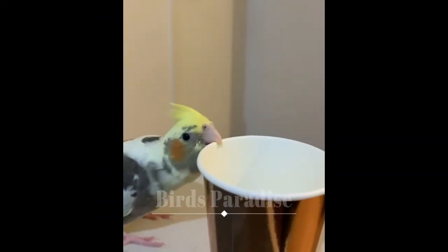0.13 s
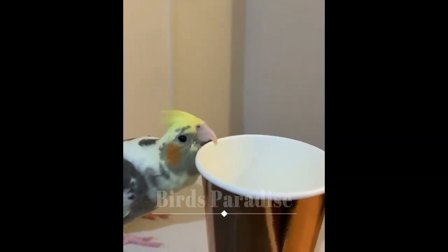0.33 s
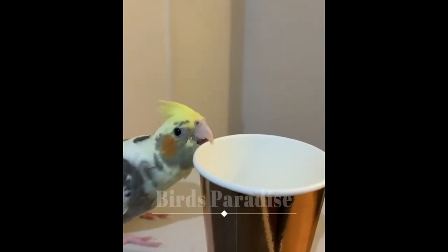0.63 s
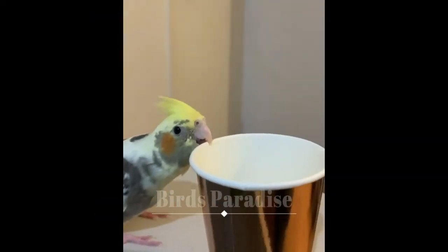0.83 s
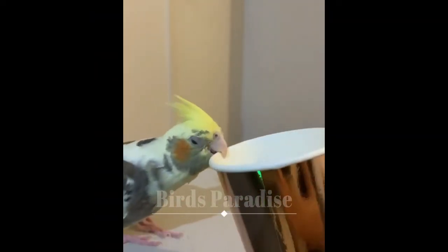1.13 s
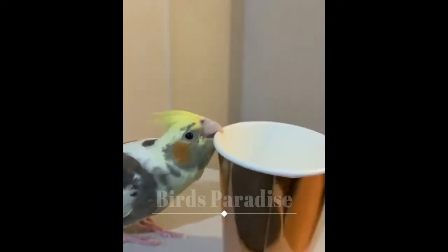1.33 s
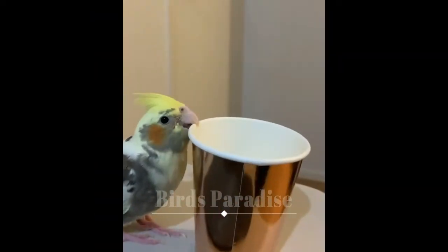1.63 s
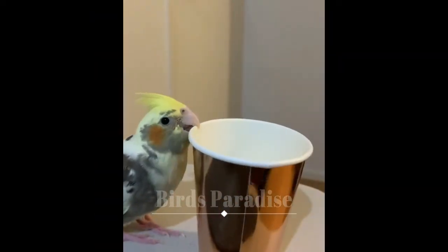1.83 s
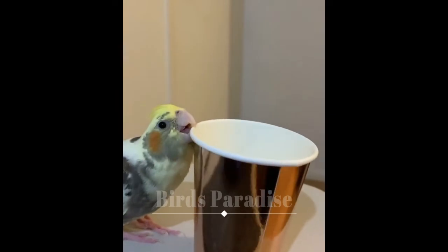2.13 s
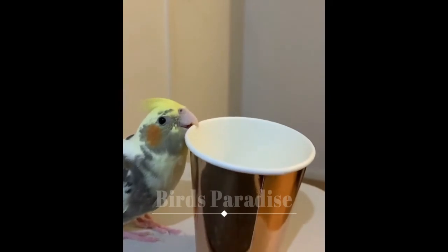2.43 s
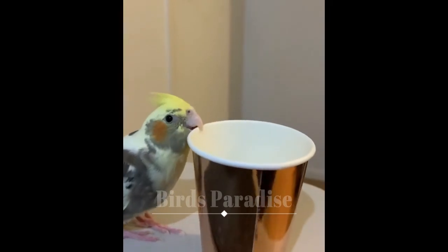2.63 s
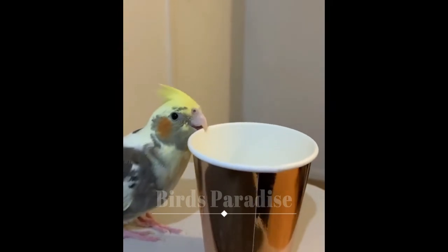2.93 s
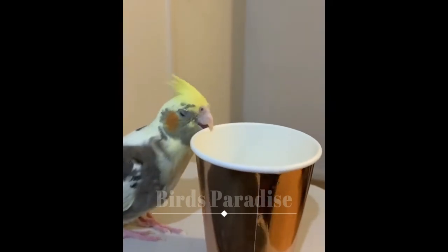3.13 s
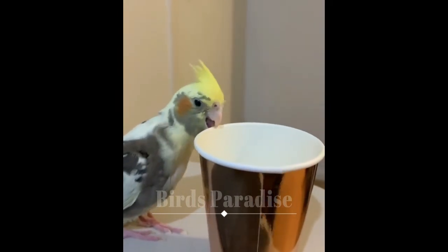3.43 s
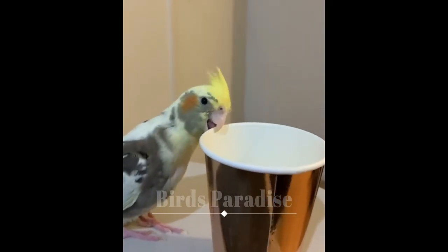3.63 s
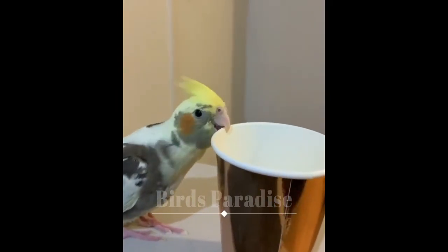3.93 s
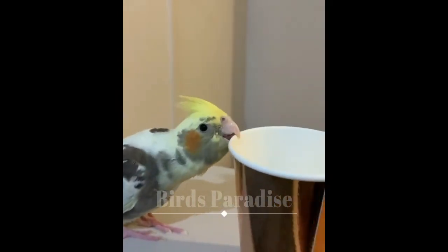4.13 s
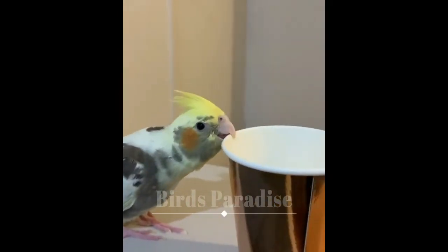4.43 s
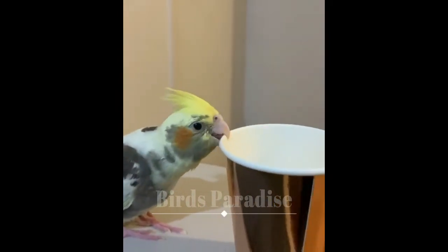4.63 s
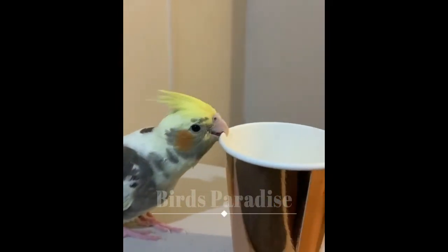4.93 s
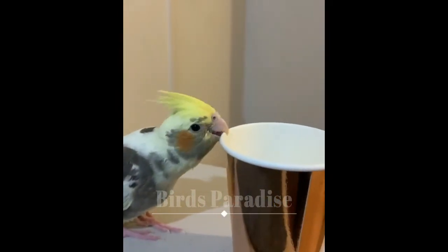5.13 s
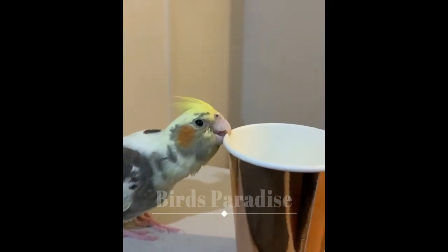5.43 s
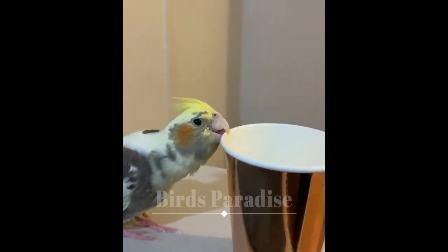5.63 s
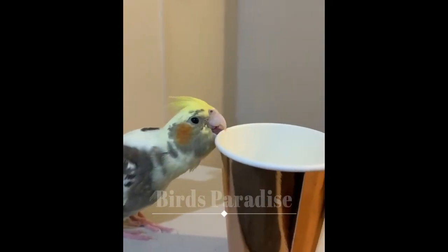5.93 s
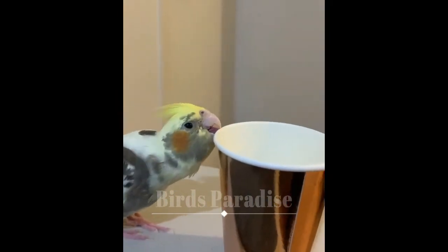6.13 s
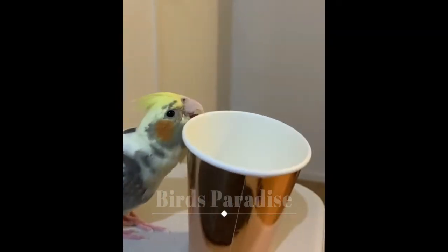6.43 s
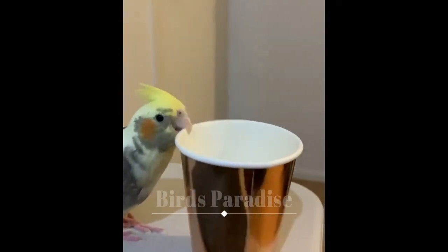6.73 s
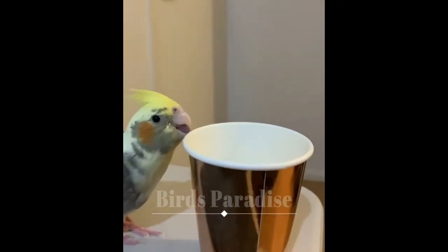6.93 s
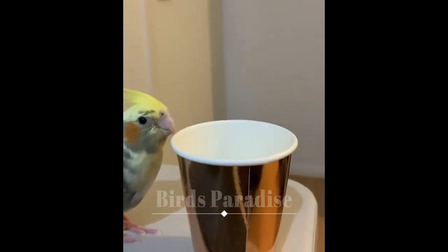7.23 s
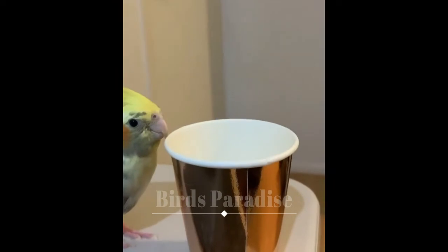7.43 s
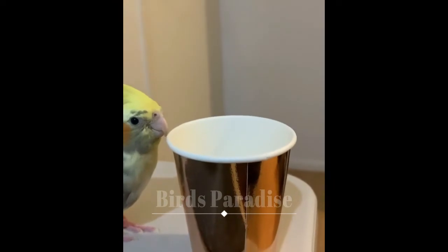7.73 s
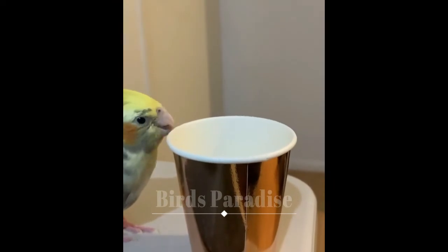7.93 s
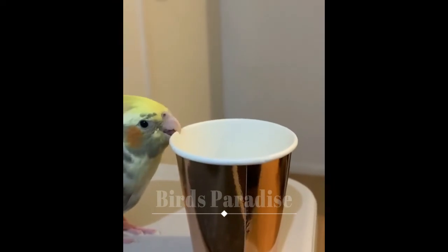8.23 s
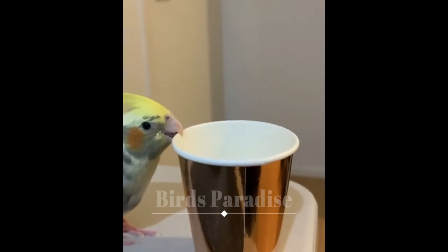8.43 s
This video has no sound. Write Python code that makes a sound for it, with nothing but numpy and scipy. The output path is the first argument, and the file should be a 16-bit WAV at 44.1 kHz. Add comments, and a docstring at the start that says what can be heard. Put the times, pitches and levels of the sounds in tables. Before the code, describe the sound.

Close to a small microphone in a quiet room, a bird nibbles an empty paper cup. Quick clusters of hollow, woody taps and papery scratches come first, with a sharp slap as the cup rocks. Nibbling then turns faint and sparse, flares twice more with brief juddering tugs, and ends with a few hard knocks and scuffs nearby over soft room air and a low rumble that stops midway.

```python
"""Cockatiel nibbling a paper cup

A cockatiel nibbles the rim of an empty paper cup on a table, close to a phone in a small room.
Beak taps excite damped modes of the cup's air, wall and table; tugs make the base stick and slip in a judder.
Filtered grains give the scrape and crackle of paper, a narrow resonance the creaks, short noise bursts the slaps.
Soft bumps, then a few hard knocks and scuffs from nearby join in, over room air, hum and a low rumble."""
import sys
import numpy as np
from scipy import signal
from scipy.fft import rfft, irfft
from scipy.io import wavfile
from scipy.ndimage import uniform_filter1d

SR = 44100
rng = np.random.default_rng(int(sys.argv[2]) if len(sys.argv) > 2 else 0)


def store_wav(level_fs):
    """Save 16-bit WAV to argv[1]."""
    pcm = np.round(np.clip(np.atleast_2d(level_fs), -1, 1) * 32767)
    wavfile.write(sys.argv[1], SR, pcm.T.astype(np.int16))


N = 378378
TIME = np.arange(N) / SR  # s
FREQS = np.fft.rfftfreq(N, 1 / SR)  # Hz

# Taps of beak and base on the cup. Each row: start in seconds, relative levels in dB of the hollow modes,
# the wall modes and the contact tick, pitch of the hollow in Hz, pitch of the wall in Hz.
TAP_EVENTS = [(0.091, -41, -47.5, -54, 610, 1090), (0.169, -34.5, -39.5, -44, 680, 1036),
              (0.24, -21.5, -34, -47, 622, 1035), (0.266, -22, -26, -46, 586, 1062),
              (0.486, -30, -44, -45, 644, 1130), (0.499, -30, -30.5, -41.5, 614, 1015),
              (0.768, -27, -36, -40, 660, 1117), (0.854, -24.5, -37.5, -51, 678, 1130),
              (0.871, -28.5, -45, -56, 715, 1110), (0.886, -31, -46, -50, 593, 1116),
              (0.948, -22.5, -36, -54, 689, 1110), (0.985, -22, -44, -50.5, 678, 1060),
              (1.105, -31.5, -41.5, -50, 667, 1080), (1.238, -24.5, -47, -51, 672, 1091),
              (1.274, -51.5, -50, -54, 669, 1089), (1.284, -14.5, -26, -40, 635, 1092),
              (1.294, -15.5, -26, -46, 620, 1030), (1.321, -20, -45, -48, 663, 1050),
              (1.339, -24.5, -49, -36, 683, 1053), (1.396, -28, -36, -34, 727, 1030),
              (1.431, -29, -48, -48, 686, 1070), (1.449, -34, -53, -56, 663, 1080),
              (1.605, -53, -43.5, -56, 660, 1093), (1.747, -47.5, -39.5, -51, 660, 1094),
              (1.826, -42.5, -42.5, -54, 677, 1060), (2.049, -34, -44, -51, 666, 1126),
              (2.134, -52.5, -40.5, -44.5, 615, 1114), (2.249, -54, -57, -46, 666, 1100),
              (2.265, -45.5, -44, -58, 674, 1110), (2.33, -50, -42, -51, 640, 1104),
              (2.59, -39, -59, -53, 667, 1010), (2.616, -30, -44.5, -70, 631, 1002),
              (2.651, -32, -45, -70, 655, 1040), (2.673, -45, -47.5, -60, 661, 1130),
              (2.706, -37, -50, -66, 620, 997), (2.804, -48.5, -42.5, -46, 697, 1096),
              (2.914, -51, -49.5, -49, 684, 1132), (3.004, -45.5, -46.5, -58, 590, 1154),
              (3.083, -46, -50, -53, 643, 1057), (3.296, -47.5, -56, -64, 728, 1043),
              (3.506, -29.5, -36.5, -54, 668, 1050), (3.821, -38.5, -39, -49, 654, 1080),
              (3.926, -29, -40.5, -40, 673, 990), (3.937, -28.5, -46, -35, 635, 1020),
              (3.957, -19.5, -32, -25, 623, 1140), (4.093, -21.5, -33.5, -51, 667, 1065),
              (4.101, -25, -30.5, -52.5, 642, 1060), (4.518, -36, -49, -43, 657, 1143),
              (4.55, -35.5, -50, -55, 646, 1131), (4.578, -45.5, -56, -58, 640, 1080),
              (4.696, -40.5, -47.5, -47.5, 618, 1107), (4.752, -45.5, -56, -58, 655, 1070),
              (4.774, -42.5, -51, -55, 660, 1118), (4.952, -44, -49.5, -70, 644, 1015),
              (4.987, -34, -39, -55, 670, 1040), (5.08, -40, -44.5, -54, 690, 1070),
              (5.242, -46.5, -60, -52, 660, 1090), (5.254, -31.5, -36.5, -50, 616, 1072),
              (5.372, -44.5, -55.5, -54, 622, 1080), (5.461, -55, -51, -65, 688, 1080),
              (5.511, -54, -58, -53, 663, 930), (5.786, -60, -48.5, -53, 654, 1120),
              (5.887, -60, -49.5, -56.5, 660, 1097), (6.158, -22.5, -42, -36.5, 643, 1057),
              (6.203, -21, -35, -33, 643, 1056), (6.221, -19.5, -54, -47, 674, 990),
              (6.261, -31.5, -58, -56, 666, 1020), (6.613, -41, -50, -48, 684, 1113),
              (6.682, -27, -52, -53, 666, 1100), (6.694, -27, -47, -58, 655, 1055),
              (6.716, -30, -45, -54, 700, 1010), (6.724, -22.5, -21, -27, 624, 1077),
              (6.764, -34, -40, -59, 643, 1010), (6.933, -36.5, -41.5, -71, 652, 1090),
              (6.952, -30.5, -40, -60.5, 694, 1063), (7.982, -54.5, -39.5, -54.5, 573, 1100),
              (8.012, -47.5, -49, -63, 666, 1070), (8.156, -42, -45, -48, 660, 1014),
              (8.171, -46, -42.5, -38, 606, 1135), (8.379, -42.5, -56, -46, 587, 1006),
              (8.402, -46, -66, -68, 567, 1000), (8.421, -54, -48, -62, 632, 1100),
              (8.555, -65, -55.5, -49, 660, 1220)]
# Tugs that drag the base over the table. Each row: start in seconds, length in seconds,
# relative judder level in dB, relative paper crackle level in dB, pitch of the hollow in Hz.
TUG_EVENTS = [(0.836, 0.061, -31, -51.5, 655.7), (0.936, 0.036, -31.5, -61, 654),
              (0.986, 0.022, -36.5, -56, 651), (1.3, 0.057, -32.5, -53, 631), (1.347, 0.062, -31, -54, 676),
              (1.413, 0.047, -37.5, -56, 667), (3.949, 0.035, -32, -43, 634),
              (6.166, 0.03, -34.5, -53, 630), (6.198, 0.043, -29.5, -49, 649),
              (6.248, 0.017, -35.5, -53, 640), (6.68, 0.032, -30, -51.5, 649)]
# Modes of the air inside the cup. Each row: multiple of its pitch, t60 in seconds, relative level in dB.
HOLLOW_MODES = [(.73, 0.024, -6), (.88, 0.029, -3), (1, 0.033, 4)]
# Modes of the paper wall. Each row: multiple of its pitch, t60 in seconds, relative level in dB.
WALL_MODES = [(.94, 0.024, -7.5), (1, 0.037, 4), (1.36, 0.024, -15.5), (1.63, 0.012, -7),
              (2.2, 0.0047, -18)]
# Spectrum of cracking fibres. Each row: frequency in Hz, relative level in dB per Hz.
FIBRE_SPECTRUM = [(500, -30.5), (2000, -2), (2750, -6), (3300, -5.5), (3900, -6), (4750, -15), (5500, 7.5),
                  (6100, -6.5), (7100, 2.5), (8000, 0.5), (9200, -21), (10500, -10.5), (12300, -34),
                  (14000, -47)]
HOLLOW_HZ, WALL_HZ = 656, 1036  # pitches of the cup at rest
TUG_ATTACK_S, TUG_RELEASE_S, TUG_SAG_DB_PER_S = 0.0083, 0.0033, 30
SCRAPE_ATTACK_S, SCRAPE_RELEASE_S, SCRAPE_SAG_DB_PER_S = 0.065, 0.014, 22


def undb(db):
    """Invert the decibel law: amplitude gain is ten to the power of dB / 20."""
    return 10 ** (np.asarray(db) / 20)


def unit(x):
    """Normalize by mean power, to rms 1."""
    return x / np.sqrt(np.mean(x ** 2))


def across(points, freqs):
    """Interpolate (Hz, value) points along a logarithmic frequency axis."""
    hz, value = np.transpose(points)
    return np.interp(np.log(freqs + 1), np.log(hz), value)


def colour(x, points):
    """Minimum-phase filtering: folding the cepstrum makes a causal filter of the given (Hz, dB) spectrum."""
    cepstrum = irfft(np.log(undb(across(points, FREQS))), N)
    cepstrum[1:N // 2] *= 2
    cepstrum[N // 2 + 1:] = 0
    return irfft(rfft(x) * np.exp(rfft(cepstrum)), N)


def walk(rate):
    """Slow random modulation: straight lines join normal random values drawn rate times a second."""
    knots = rng.standard_normal(4096)
    return np.interp(TIME * rate, np.arange(len(knots)), knots)


def add(track, s, sound):
    """Linear superposition: mix a sound in at time s."""
    start = max(int(s * SR), 0)
    part = sound[:max(N - start, 0)]
    track[start:start + len(part)] += part


def ring(modes, pitch=1, scatter_db=0, sag_per_s=0, size=8000):
    """Modal decay after one blow: damped sines whose shares vary with the point of contact; pitch may sag."""
    t = TIME[:size]
    turns = pitch * np.cumsum(np.exp(-sag_per_s * t)) / SR
    total = np.zeros(len(t))
    for hz, t60, db in modes:
        gain = undb(db + scatter_db * rng.standard_normal())
        total += gain * np.sin(2 * np.pi * hz * turns) * np.exp(-np.log(1000) * t / t60)
    return total


def grains(rate, spread_db):
    """Shot noise of friction: random tiny slips of uneven size and either sign, at rms 1."""
    sizes = undb(spread_db * np.minimum(rng.exponential(size=N), 3.5)) * rng.choice([-1, 1], N)
    return unit((rng.random(N) < rate / SR) * sizes)


def scratch(rise_s, decay_s, size=2400):
    """Contact noise: grainy noise swells and dies exponentially as two surfaces touch."""
    t = TIME[:size]
    # each run of 20 samples has its own random level
    grain = rng.standard_normal(size) * undb(2.57 * rng.standard_normal(size // 20).repeat(20))
    return grain * (1 - np.exp(-t / rise_s)) * np.exp(-t / decay_s)


def stroke(length, attack_s, release_s, sag_db_per_s):
    """Pressure envelope of friction: it builds, eases slowly while held, and is let go."""
    t = TIME[:SR // 2]
    held = np.minimum(t / attack_s, 1) * undb(-sag_db_per_s * t)
    return held * np.exp(-np.maximum(t - length, 0) / release_s)


def hum():
    """Periodic excitation by mains and fan: low tones whose level and phase waver a little."""
    # Each row: frequency in Hz, relative level in dB.
    hum_tones = [(76, -64.5), (100, -66.5), (138, -65.5)]
    total = np.zeros(N)
    for hz, db in hum_tones:
        level = undb(db + 2.5 * walk(rate=4))
        total += level * np.sqrt(2) * np.sin(2 * np.pi * hz * TIME + walk(rate=7))
    return total


def background(air_db=-58, width=1.0, bass_width=0.37, left_db=0.72):
    """Diffuse-field coherence: room air more alike at both ports in the bass, plus rumble and hum."""
    # Spectrum of the room air. Each row: frequency in Hz, relative level in dB.
    air_spectrum = [(24, -39), (40, 3.5), (112, -1), (140, -1), (197, -3.5), (337, -9.5), (453, -10),
                    (654, -17), (968, -22), (1070, -20), (2520, -42.5), (3300, -45.5), (9230, -47),
                    (11800, -43), (14000, -97)]
    rumble_db, rumble_ends_s, rumble_fade_s = -63, 5.12, 0.23
    mid, side = unit(colour(rng.standard_normal((2, N)), air_spectrum))
    side = irfft(rfft(side) * across([(150, bass_width), (400, width)], FREQS), N)
    air = undb(air_db + walk(rate=2.97)) * (mid + np.array([side, -side]))
    low_spectrum = [(22, -48.5), (27, -22.0), (35, -8.5), (60, -22.0), (130, -30.0), (500, -76)]
    low = unit(colour(rng.standard_normal(N), low_spectrum))
    # the rumble dies away part of the way through
    rumble = undb(rumble_db) * low * np.clip((rumble_ends_s - TIME) / rumble_fade_s, 0, 1)
    return (air + hum() + rumble) * undb([[left_db], [-left_db]])  # a little stronger on the left


def sliding(tug_rub_db=-3, lead_s=0.057, slide_s=0.045, slide_crackle_db=-64, slide_rub_db=-60, follow=0.45):
    """Friction follows pressure: strength of crackle and rub in scrapes, tugs and slides around each tap."""
    # Scrapes and rubs, mostly of the beak on paper, a late one from nearby. Each row: start in seconds,
    # length in seconds, relative crackle level in dB, relative rub level in dB.
    scrape_events = [(0.283, 0.28, -62.5, -48), (0.52, 0.25, -67, -49.5), (0.815, 0.018, -45, -45),
                     (0.905, 0.037, -44.5, -46.5), (1.103, 0.19, -65, -53.5), (1.527, 0.32, -70, -56.5),
                     (1.876, 0.098, -90, -60), (1.997, 0.23, -92, -55.5), (2.295, 0.082, -89, -54.5),
                     (2.531, 0.044, -49, -56), (2.668, 0.086, -62, -55.5), (2.872, 0.19, -81, -55),
                     (3.075, 0.33, -86, -68.5), (3.533, 0.24, -61.5, -62), (3.966, 0.14, -57.5, -61),
                     (4.487, 0.061, -58, -63), (4.718, 0.067, -63, -58.5), (5.163, 0.15, -77.5, -70),
                     (5.724, 0.042, -75, -56.5), (6.545, 0.029, -52.5, -69), (6.741, 0.11, -64, -59.5),
                     (7.04, 0.037, -51, -57), (7.089, 0.13, -96, -56), (7.705, 0.037, -72, -55),
                     (8.077, 0.24, -61, -66), (8.283, 0.14, -68.5, -62.5), (8.544, 0.039, -52, -50)]
    crackle, rub = np.zeros((2, N))
    for s, length, crackle_db, rub_db in scrape_events:
        swell = stroke(length, SCRAPE_ATTACK_S, SCRAPE_RELEASE_S, SCRAPE_SAG_DB_PER_S)
        add(crackle, s, undb(crackle_db) * swell)
        add(rub, s, undb(rub_db) * swell)
    for s, length, _, db, _ in TUG_EVENTS:
        swell = undb(db) * stroke(length, TUG_ATTACK_S, TUG_RELEASE_S, TUG_SAG_DB_PER_S)
        add(crackle, s, swell)
        add(rub, s, undb(tug_rub_db) * swell)
    # the beak slides briefly into and out of each tap, harder for a louder one
    for s, *levels, _, _ in TAP_EVENTS:
        pressure = undb(follow * (max(levels) + 15.5))
        swell = pressure * stroke(slide_s, lead_s, SCRAPE_RELEASE_S, SCRAPE_SAG_DB_PER_S)
        add(crackle, s - lead_s, undb(slide_crackle_db) * swell)
        add(rub, s - lead_s, undb(slide_rub_db) * swell)
    return crackle, rub


def shifting(x, depth_db, rate):
    """Random colour: half-octave bands of the scrape and crackle swell and fade independently."""
    octaves = np.log2(np.clip(FREQS, 700, 11200) / 700)
    spectrum = rfft(x)
    total = np.zeros(N)
    for k in range(9):
        band = irfft(spectrum * np.maximum(1 - abs(2 * octaves - k), 0), N)
        total += band * undb(depth_db * walk(rate))
    return total


def paper(crackle_db=0, rub_db=1, snap_db=5, murmur_db=-2, flicker_db=0.5, surge_db=5.0):
    """Granular friction: fibres crackle and rub, the cup murmurs along, and short sharp snaps stand out."""
    # Short, sharp snaps and cracks, mostly of paper at the beak, a few late ones from nearby.
    # Each row: start in seconds, relative level in dB.
    snap_events = [(0.265, -46), (0.485, -46), (0.499, -38), (0.757, -42), (0.7754, -37.5), (0.837, -38),
                   (0.855, -48), (0.864, -30), (0.875, -43), (0.948, -42), (0.956, -37.5), (0.966, -41),
                   (0.998, -41), (1.189, -37), (1.208, -43.5), (1.238, -38.5), (1.255, -28), (1.381, -43),
                   (1.402, -47), (1.746, -42.5), (2.047, -41), (2.249, -46), (2.264, -51), (2.803, -47.5),
                   (2.894, -50), (3.1, -52), (3.58, -41), (3.6316, -45), (3.741, -50), (4.779, -40.5),
                   (4.794, -52), (5.463, -53.5), (4.08, -36), (5.251, -47), (6.174, -36), (6.183, -34.5),
                   (6.195, -31), (6.7035, -29.5), (7.981, -28), (8.0613, -38.5), (8.072, -40), (8.17, -37),
                   (8.117, -38), (8.471, -51.5), (8.5709, -35.5)]
    # Spectrum of the beak rubbing on paper. Each row: frequency in Hz, relative level in dB per Hz.
    rub_spectrum = [(150, 5), (500, 12), (800, 10), (1150, 11), (1700, 3), (2600, 3), (3300, -9),
                    (4000, -8), (4800, -15.5), (7000, -11.5), (12000, -41.5)]
    crackle, rub = sliding()
    snaps = np.zeros(N)
    for s, db in snap_events:
        add(snaps, s, undb(db + snap_db) * scratch(rise_s=0.000083, decay_s=0.0021))
    catch = undb(flicker_db * walk(rate=210) + surge_db * walk(rate=29))  # the beak catches and slips
    fibres = unit(colour(grains(rate=2200, spread_db=4.5), FIBRE_SPECTRUM))
    friction = unit(colour(grains(rate=4000, spread_db=3.5), rub_spectrum))
    cup = ring(HOLLOW_MODES, HOLLOW_HZ) + ring(WALL_MODES, WALL_HZ)
    murmur = unit(signal.fftconvolve(grains(rate=250, spread_db=-7.0), cup)[:N])
    crackling = undb(crackle_db) * catch * crackle * (fibres + undb(murmur_db) * murmur)
    rubbing = undb(rub_db) * catch ** 0.38 * rub * friction
    return shifting(crackling + rubbing, depth_db=3.5, rate=28) + colour(snaps, FIBRE_SPECTRUM)


def taps(hollow_db=3.5, wall_db=4.5, tick_db=1, click_db=-8, strike_db=-12, give_s=0.0019, softness=0.015):
    """Impact excitation: taps ring the cup at a pitch set by the grip; a gentle touch sinks in longer."""
    air_lag_s = 0.0018  # the air inside follows the wall
    cup, ticks, clicks, strikes = np.zeros((4, N))
    for s, hollow, wall, tick, hollow_hz, wall_hz in TAP_EVENTS:
        air = ring(HOLLOW_MODES, hollow_hz, scatter_db=2.0, size=2600)
        shell = ring(WALL_MODES, wall_hz, scatter_db=1.5, size=2600)
        t = TIME[:len(air)]
        contact_s = give_s * np.exp(softness * (-25 - max(hollow, wall)))
        press = 1 - np.exp(-t / contact_s)
        swell = 1 - np.exp(-t / (contact_s + air_lag_s))
        add(cup, s, swell * undb(hollow + hollow_db) * air + press * undb(wall + wall_db) * shell)
        # the hard tip meets the rim
        add(strikes, s, undb(wall + strike_db) * scratch(rise_s=0.0002, decay_s=0.0013))
        # the wall's dense upper modes
        add(clicks, s, undb(wall + click_db) * scratch(rise_s=0.0013, decay_s=0.0056))
        add(ticks, s - contact_s, undb(tick + tick_db) * scratch(rise_s=0.0018, decay_s=0.0055))
    upper = colour(clicks, [(600, -9.5), (1600, 10.5), (2800, 4.5), (3800, 5),
                            (4800, -16.5), (10000, -36), (13000, -28.0)])
    crisp = colour(strikes, [(600, -10), (1800, 3), (3800, -16.5), (5000, -3.5), (8000, -3.5), (13000, -26)])
    return cup + upper + crisp + colour(ticks, FIBRE_SPECTRUM)


def thumps(level_db=-24, contact_s=0.004):
    """Structure-borne transmission: every tap passes through the base and thumps the table top."""
    # Modes of the table under the cup. Each row: frequency in Hz, t60 in seconds, relative level in dB.
    table_modes = [(150, 0.08, -3), (266.7, 0.076, 1.5), (445, 0.032, -3.5)]
    out = np.zeros(N)
    for s, hollow, wall, *_ in TAP_EVENTS:
        top = ring(table_modes, scatter_db=3.0, size=4000)
        press = 1 - np.exp(-TIME[:len(top)] / contact_s)
        add(out, s, undb(max(hollow, wall) + level_db) * top * press)
    return out


def creaks(level_db=0, t60_s=0.005, glide=0.114):
    """Tension raises resonance: quick slips ring a patch of rim whose pitch climbs as the beak pulls it taut."""
    # Each row: start in seconds, length in seconds, starting pitch in Hz, relative level in dB.
    creak_events = [(0.373, 0.04, 1794, -47.5), (2.123, 0.026, 3370, -53.5), (3.73, 0.025, 2650, -59),
                    (4.023, 0.02, 1950, -44), (4.625, 0.021, 1785, -55.5), (8.048, 0.012, 1793, -42.5)]
    out = np.zeros(N)
    for s, length, hz, db in creak_events:
        swell = stroke(length, attack_s=0.014, release_s=0.0082, sag_db_per_s=33)
        t = TIME[:len(swell)]
        slips = signal.fftconvolve(rng.standard_normal(len(t)), ring([(hz, t60_s, 0)]), mode="same")
        # reading ever faster until the stroke's end raises the pitch
        warped = t + glide * np.minimum(t, length) ** 2 / (2 * length)
        rising = np.interp(warped, t, unit(slips))
        add(out, s, undb(db + level_db) * swell * rising)
    return out


def judder(level_db=0, wall_db=0, slip_hz=165, uneven=0.45, soft_hz=1500, hollow_hz=645,
           pure_db=-3.0, slips_db=-6.5, drift=0.82, throb_db=2):
    """Stick-slip: each slip of the base rings the cup, its swing evened out, along with a wavering hollow tone."""
    gaps = np.exp(uneven * rng.standard_normal(4000)) / slip_hz
    at = (np.cumsum(gaps) * SR).astype(int)
    slips = np.bincount(at[at < N], minlength=N)
    # driven from the base, the air inside rings more purely than under the beak
    body = ring([(hollow_hz, 0.06, 11), (560, 0.035, 1), (745, 0.035, 1)])
    body = body + undb(wall_db) * ring(WALL_MODES, WALL_HZ)
    soften = signal.butter(2, soft_hz, fs=SR, output="sos")
    pushes = signal.sosfilt(soften, np.diff(slips, prepend=0))
    cup = signal.fftconvolve(pushes, body)[:N]
    levelled = cup / np.sqrt(uniform_filter1d(cup ** 2, size=900) + 1e-9)
    # a steady hollow tone whose phase and level waver at random
    tone = np.sqrt(2) * np.sin(2 * np.pi * hollow_hz * TIME + drift * walk(rate=45))
    tone = tone * undb(throb_db * walk(rate=73))
    even = undb(slips_db) * levelled + undb(pure_db) * tone
    out = np.zeros(N)
    for s, length, db, _, hz in TUG_EVENTS:
        pull = undb(db + level_db) * stroke(length, TUG_ATTACK_S, TUG_RELEASE_S, TUG_SAG_DB_PER_S)
        # the reading speed sets this tug's pitch
        add(out, s, pull * np.interp(s + TIME[:len(pull)] * hz / hollow_hz, TIME, even))
    return out


def slaps(level_db=-6):
    """Broadband impact: the rocking cup's base lands flat with a short, hard crack."""
    # Each row: start in seconds, relative level in dB.
    slap_events = [(0.9468, -22), (0.9655, -33), (1.2826, -10), (1.294, -23), (1.313, -28.5),
                   (3.9542, -34.5), (3.9701, -26), (6.2148, -33), (6.2314, -28)]
    # Each row: frequency in Hz, relative level in dB per Hz.
    slap_spectrum = [(400, -21.5), (1500, 2), (2800, 8.5), (4500, 2.5), (5600, -1), (7500, 4),
                     (9500, -10.5), (14000, -19)]
    out = np.zeros(N)
    for s, db in slap_events:
        add(out, s, undb(db + level_db) * scratch(rise_s=0.0001, decay_s=0.0018))
    return colour(out, slap_spectrum)


def bumps(push_s=0.037):
    """Soft forcing of a low resonance: gentle pushes sway the table top."""
    # Each row: start in seconds, pitch in Hz, level in dB.
    bump_events = [(2.322, 139.8, -45.5), (4.498, 67, -47.5), (4.556, 57, -46)]
    out, t = np.zeros(N), TIME[:SR // 2]
    for s, hz, db in bump_events:
        swell = t / push_s * np.exp(1 - t / push_s)  # peaks at push_s
        add(out, s, undb(db) * np.sin(2 * np.pi * hz * t) * swell)
    return out


def knocks(clack_db=1, body_db=0, thud_db=0, crack_db=-12, scuff_db=0, contact_s=0.00087):
    """Modal impact of hard things nearby: crack and clack over a body sinking in pitch, thud; scuffs around."""
    # Each row: start in seconds, relative levels in dB of clack, body and thud,
    # body pitch in Hz, clack pitch in Hz.
    knock_events = [(7.0319, -31, -45.5, -77.5, 840, 2170), (7.0962, -33, -37, -51.5, 890, 1970),
                    (7.107, -24.5, -28.5, -43.5, 696, 2016), (7.1186, -33.5, -43, -62, 630, 2010),
                    (7.136, -53.5, -41.5, -54, 530, 2060), (7.149, -35, -32, -39, 462, 2200),
                    (7.166, -36.5, -41, -43, 399, 1800), (8.2075, -19, -41.5, -38.5, 451, 2790),
                    (8.2139, -24.5, -51.5, -48, 436, 1650), (8.2218, -36, -41.5, -47, 333, 1870),
                    (8.5734, -54, -46.5, -56, 312, 2116)]
    # Each row: multiple of the clack's pitch, t60 in seconds, relative level in dB.
    clack_modes = [(.6, 0.039, -14), (1, 0.015, 2.5), (1.06, 0.014, -5.5), (1.36, 0.009, 0)]
    # Each row: multiple of the body's pitch, t60 in seconds, relative level in dB.
    body_modes = [(.68, 0.049, -5), (1, 0.064, 5.5), (1.27, 0.019, 3.5)]
    # Each row: frequency in Hz, t60 in seconds, relative level in dB.
    thud_modes = [(140, 0.2, -1.5), (236, 0.206, -10.5)]
    # Each row: start in seconds, length in seconds, relative level in dB.
    scuff_events = [(7.045, 0.015, -47.5), (7.128, 0.013, -59), (7.19, 0.02, -73), (8.05, 0.025, -44),
                    (8.114, 0.01, -45.5), (8.228, 0.035, -40.5), (8.299, 0.053, -65)]
    # Each row: frequency in Hz, relative level in dB per Hz.
    scuff_spectrum = [(300, 7.5), (900, -2.5), (1500, 0), (2200, 6.5), (2800, 4.5), (3300, 1.5),
                      (3900, 1.5), (5000, -16), (6500, -4.5), (9000, -18), (11500, -12.5), (13500, -38)]
    out, cracks, drag = np.zeros((3, N))
    for s, clack, body, thud, body_hz, clack_hz in knock_events:
        add(cracks, s, undb(clack + crack_db) * scratch(rise_s=0.0014, decay_s=0.0047))
        blow = undb(clack + clack_db) * ring(clack_modes, clack_hz)
        blow += undb(body + body_db) * ring(body_modes, body_hz, sag_per_s=6.0)
        blow += undb(thud + thud_db) * ring(thud_modes)
        add(out, s, blow * (1 - np.exp(-TIME[:len(blow)] / contact_s)))
    for s, length, db in scuff_events:
        swell = stroke(length, attack_s=0.0072, release_s=0.018, sag_db_per_s=85)
        add(drag, s, undb(db + scuff_db) * swell)
    scuff = drag * unit(colour(grains(rate=1700, spread_db=1.5), scuff_spectrum))
    crack = colour(cracks, [(400, -21.5), (1000, -4), (1700, 21.5), (2800, 3.5), (3500, 4.5), (4300, 1.5),
                            (5400, -12), (8000, -10.5), (11500, -14), (13500, -28)])
    return out + scuff + crack


def room(x, t60_s, treble_t60_s, split_hz, early_s, early):
    """Reverberation: dense early echoes and a longer tail whose treble dies first, different at each port."""
    t = TIME[:SR]
    noise = rng.standard_normal((2, SR))
    low = signal.sosfiltfilt(signal.butter(3, split_hz, fs=SR, output="sos"), noise)
    tail = low * np.exp(-np.log(1000) * t / t60_s)
    tail = tail + (noise - low) * np.exp(-np.log(1000) * t / treble_t60_s)
    onset = np.clip(t / 0.0041 - 1, 0, 1)  # silent for 4.1 ms, then rising for as long
    tail = tail * (1 + early * np.exp(-t / early_s)) * onset
    return signal.fftconvolve(x[None], unit(tail) / np.sqrt(SR), axes=1)[:, :N]


def ports(x, phase, share=1):
    """Interaural-style cues: two microphone ports differ in phase and, more for a near source, in level."""
    # Left minus right for the cup, scaled by share. Each row: frequency in Hz, level difference in dB.
    port_balance = [(200, 1), (670, 2.5), (1200, -1), (2500, 0.5)]
    turn = np.exp(.5j * across(phase, FREQS)) * undb(share * across(port_balance, FREQS) / 2)
    return irfft(rfft(x) * np.array([turn, 1 / turn]), N)


def scene(cup_room_db=-13, knock_room_db=-9):
    """Direct-to-reverberant ratio conveys distance: the cup close by, the knocks further off and wetter."""
    # Phase by which the left port leads for the cup. Each row: frequency in Hz, phase in radians.
    cup_phase = [(150, 5), (340, -3), (600, -0.72), (1200, -1), (1750, 0.21), (2100, 4.5), (2800, 3.5),
                 (4000, 3.5), (5400, 4), (6200, 5), (7300, 8), (8350, 11), (10500, 11.5), (11400, 18.5),
                 (12500, 17)]
    # Phase by which the left port leads for the knocks. Each row: frequency in Hz, phase in radians.
    knock_phase = [(150, -0.5), (400, -2), (700, -2.4), (1300, -2), (4000, -2), (8000, -1)]
    # Filter for what the cup sends into the room, broader than its ring.
    # Each row: frequency in Hz, gain in dB.
    room_spread = [(300, 2), (520, 2.5), (660, 3), (850, 0.5), (1090, -1.5), (1400, 4.5), (3000, 0.5),
                   (8000, 2.5)]
    cup = taps() + thumps() + slaps() + judder() + paper() + creaks()
    far = knocks()
    cup_echo = undb(cup_room_db) * room(colour(cup, room_spread), t60_s=0.51, treble_t60_s=0.18,
                                        split_hz=3700, early_s=0.051, early=2.0)
    far_echo = undb(knock_room_db) * room(far, t60_s=0.51, treble_t60_s=0.36,
                                          split_hz=6300, early_s=0.013, early=3.8)
    direct = ports(cup, cup_phase) + ports(far, knock_phase, share=0.83)
    return direct + cup_echo + far_echo + bumps() + background()


def record(dry):
    """Band limiting: the phone's steep low-pass filter removes the top above 14 kHz."""
    return signal.sosfilt(signal.ellip(8, .2, 70, 14000, fs=SR, output="sos"), dry)


dry = scene()
out = record(dry)
store_wav(out)
```